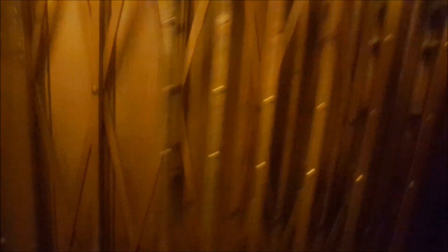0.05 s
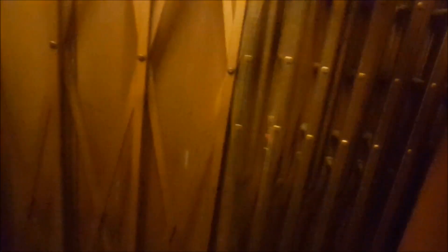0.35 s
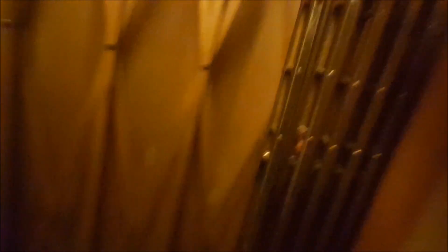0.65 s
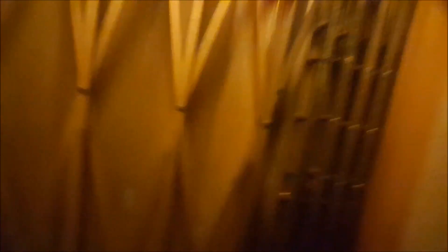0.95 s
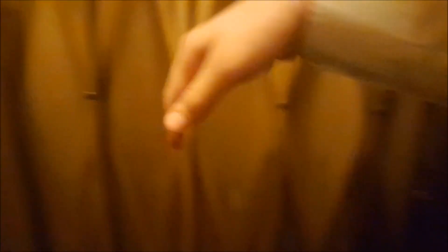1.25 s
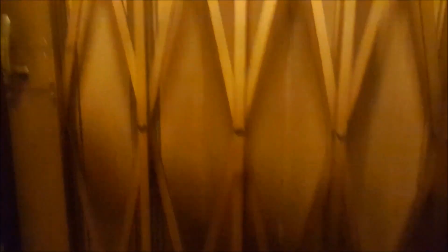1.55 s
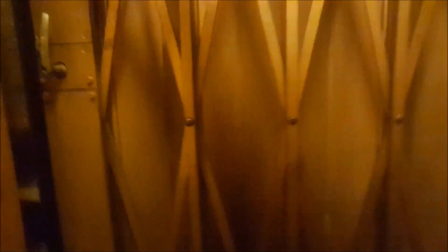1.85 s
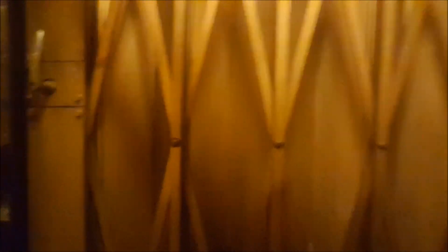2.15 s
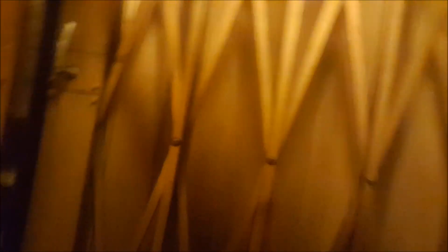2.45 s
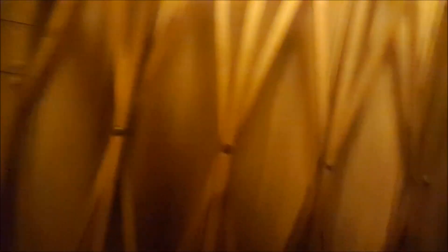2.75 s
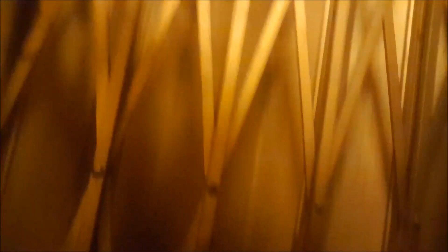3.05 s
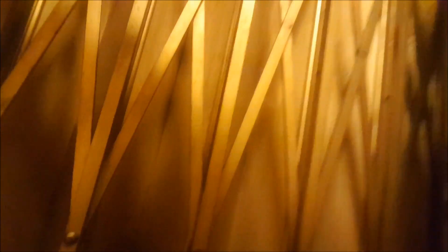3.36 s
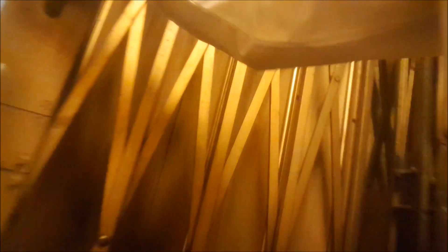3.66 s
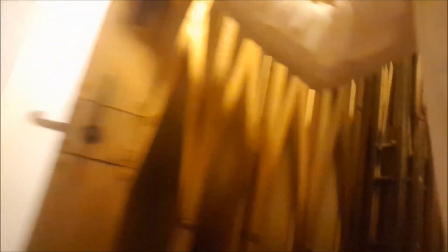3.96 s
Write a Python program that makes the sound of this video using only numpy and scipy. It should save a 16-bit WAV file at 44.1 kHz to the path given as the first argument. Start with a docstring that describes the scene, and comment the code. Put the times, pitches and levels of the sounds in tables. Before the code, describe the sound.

A folding metal lattice gate rattles and clanks, pauses, then is dragged again.

```python
"""Folding lattice gate in a small old lift

A steel gate is run along its track, rests, and is dragged again. The rollers groan and drive the
cabin into resonance; loose links tick and bars clank, each impact ringing in damped modes.
In the pause a soft rustle passes and the gate takes a knock; a low rumble lies underneath."""
import sys
import numpy as np
from scipy import signal
from scipy.fft import rfft, irfft
from scipy.io import wavfile
from scipy.ndimage import uniform_filter1d

SR = 44100
rng = np.random.default_rng(int(sys.argv[2]) if len(sys.argv) > 2 else 0)


def master(y):
    """Save y as 16-bit WAV."""
    cut = np.clip(np.atleast_2d(y).T, -1, 1)
    pcm = np.round(cut * 32767)  # scale
    wavfile.write(sys.argv[1], SR, pcm.astype(np.int16))


N = 176400
T = np.arange(N) / SR
AGE = T[:SR // 2]  # seconds since an impact
TILT_FROM_HZ = 580  # brightness tilts a spectrum above this frequency


def from_db(db):
    """Amplitude grows tenfold for every 20 dB."""
    return 10 ** (np.asarray(db) / 20)


def rms_one(x):
    """Normalisation to unit mean power."""
    return x / np.sqrt(np.mean(x ** 2) + 1e-20)


def envelope(rows):
    """Amplitude over time, interpolated in decibels."""
    return from_db(np.interp(T, *np.transpose(rows)))


def at_hz(points, hz):
    """Interpolation on a logarithmic frequency axis."""
    frequencies, values = np.transpose(points)
    return np.interp(np.log(hz + 1), np.log(frequencies), values)


def decay(t60):
    """Exponential damping: 60 dB in t60 seconds."""
    return from_db(-60 * AGE / t60)


def add(out, start_s, sound):
    """Superposition: a sound sums into the mix from its start time."""
    i = max(int(start_s * SR), 0)
    out[:, i:i + sound.shape[1]] += sound[:, :N - i]


def contacts(per_s, spread_db):
    """A Poisson process of small impacts of uneven strength."""
    hits = rng.random(N) < per_s / SR
    strength = from_db(spread_db * np.minimum(rng.exponential(1, N), 3))
    return hits * strength * rng.standard_normal((2, N))


# The stereo field. Each row: frequency in Hz, left-right correlation.
COHERENCE = [(40,.99),(100,.95),(170,.95),(270,.9),(450,.8),(740,.4),(1300,0),(12000,0)]
# Each row: frequency in Hz, left minus right level in dB.
BALANCE = [(50,1.5),(210,0),(350,9.5),(500,3.5),(770,2),(1800,.3),(4200,0),(6400,-2.5),(9500,6),(14000,0)]

def coloured(pair, spectrum, tilt_db=0):
    """Partial coherence: sum and difference of two signals form a filtered stereo field of unit rms."""
    hz = np.fft.rfftfreq(pair.shape[1], 1 / SR)
    mid, side = rfft(pair)
    alike = np.clip(at_hz(COHERENCE, hz), -.99, .995)
    sign = np.array([[1], [-1]])
    field = np.sqrt(1 + alike) * mid + sign * np.sqrt(1 - alike) * side
    octaves = np.log2(np.maximum(hz / TILT_FROM_HZ, 1))
    gain_db = at_hz(spectrum, hz) + tilt_db * octaves + sign * at_hz(BALANCE, hz) / 2
    return rms_one(irfft(field * from_db(gain_db), pair.shape[1]))


def noise(spectrum, size=N, tilt_db=0):
    """Spectral shaping of white noise, in stereo."""
    return coloured(rng.standard_normal((2, size)), spectrum, tilt_db)


# Spectra of the background. Each row: frequency in Hz, relative density in dB.
AIR_SPECTRUM = [(18, -15), (30, -6), (64, 10), (173, -34), (264, -7.5), (309, -22), (1080, -10),
                (1170, -21.5), (15700, -35.5)]
RUMBLE_SPECTRUM = [(15,2),(30,-10),(52,4.5),(70,-17.5),(88,-4.5),(110,-10),(170,-12),(400,-73)]
RUSTLE_SPECTRUM = [(300,-29),(700,7),(1500,6),(2800,2),(5000,-5),(9300,-9.5),(10400,-19.5),(15500,-16.5)]
# Their envelopes. Each row: time in seconds, relative level in dB.
RUMBLE_LEVELS = [(0.0, -33), (0.34, -44), (0.79, -37), (1.58, -61.5), (1.67, -48), (2.06, -70),
                 (2.46, -44.5), (2.9, -65), (3.14, -34.5), (3.41, -35.5), (3.51, -47), (3.56, -34.5),
                 (3.92, -47), (4.0, -47)]
RUSTLE_LEVELS = [(1.2,-69),(1.42,-59),(1.62,-67.5),(1.9,-58.5),(2.05,-60),(2.25,-53.5),(2.35,-56.5),(2.46,-55),(2.53,-65.5),(2.78,-70),(2.9,-57),(2.97,-44.5),(3.02,-48.5),(3.1,-83)]

def background():
    """Amplitude-modulated noise: a soft rustle and a low rumble swell over steady air."""
    rustle = envelope(RUSTLE_LEVELS) * noise(RUSTLE_SPECTRUM)
    rumble = envelope(RUMBLE_LEVELS) * noise(RUMBLE_SPECTRUM)
    return from_db(1.5) * (rustle + rumble) + from_db(-62.5) * noise(AIR_SPECTRUM)


# Envelopes of the two rubs. Each row: time in seconds, level in dB.
SCUFF_LEVELS = [(1.62,-80),(1.655,-49),(1.7,-45),(1.74,-64),(1.86,-85)]
LATCH_LEVELS = [(2.41,-79),(2.424,-41),(2.43,-32.5),(2.441,-45),(2.453,-47.5),(2.49,-90),(2.52,-92)]
# Their spectra. Each row: frequency in Hz, relative density in dB.
SCUFF_SPECTRUM = [(200,-5),(650,4),(1500,-3),(4000,-7.5),(9000,-22),(11000,-33),(15500,-31)]
LATCH_SPECTRUM = [(200,-19),(1000,4.5),(2200,-6),(3300,2),(4150,5.5),(5400,-6),(9000,-9),(10500,-24),(15000,-30)]

def scrapes():
    """Sliding friction makes noise: the gate scuffs as it settles, and the latch scrapes shut."""
    out = np.zeros((2, N))
    for levels, spectrum in (LATCH_LEVELS, LATCH_SPECTRUM), (SCUFF_LEVELS, SCUFF_SPECTRUM):
        touching = (T > levels[0][0]) * (T < levels[-1][0])
        out += envelope(levels) * touching * noise(spectrum)
    return out


def wobble(per_s):
    """Random modulation: straight lines join Gaussian values of unit spread."""
    steps = np.arange(0, T[-1] + 1, 1 / per_s)
    return np.interp(T, steps, rng.standard_normal(N)[:len(steps)])


# Groans and chirps. Each row: midpoint in seconds, length in seconds, pitch in Hz, level in dB.
GROAN_EVENTS = [(0.168,0.14,445,-31),(0.376,0.12,320,-27),(0.566,0.47,318,-33.5),(0.606,0.66,683.3,-42),(.7,.4,84,-36),(0.795,0.094,947,-50),(1.083,0.04,954,-41.5),(1.188,0.17,408,-44),(1.79,.2,166.7,-42.5),(1.753,0.18,567,-52),(1.851,0.073,315,-45),(1.966,.16,443,-56)]

def groans(waver_hz=11, rough_db=3.0):
    """Sustained resonance: a binding roller or strained panel holds one unsteady tone for a moment."""
    out = np.zeros(N)
    for middle, length, hz, db in GROAN_EVENTS:
        swell = np.maximum(1 - (2 * (T - middle) / length) ** 2, 0)
        phase = 2 * np.pi * np.cumsum(hz + waver_hz * wobble(per_s=86)) / SR
        out += swell * from_db(db + rough_db * wobble(per_s=84)) * np.sin(phase)
    return out * from_db([[1.2], [-1.2]])  # slightly to the left


# Rattle of the joints. Each row: time in seconds, relative level in dB.
CHATTER_LEVELS = [(0,-40.5),(.2,-40.5),(.35,-46),(.6,-49.5),(.95,-47.5),(1.08,-55),(1.4,-68.5),(1.6,-94),(2.95,-103),(3.05,-41),(3.28,-35.5),(3.38,-41.5),(3.45,-38),(3.51,-49),(3.58,-43.5),(3.8,-37.5),(4,-40)]
# Each row: frequency in Hz, relative density in dB.
CHATTER_SPECTRUM = [(60,-37),(500,7.5),(1300,11.5),(2400,5.5),(5000,0),(8500,-13),(10400,-19),(15500,-16.5)]

def chatter(per_s=520, t60=0.075, db=-2.5):
    """Shot noise: countless small touches in the lattice's joints overlap as decaying bursts."""
    burst = rng.standard_normal((2, len(AGE))) * decay(t60)
    touches = signal.fftconvolve(contacts(per_s, spread_db=3), burst, axes=1)[:, :N]
    return from_db(db) * envelope(CHATTER_LEVELS) * coloured(touches, CHATTER_SPECTRUM)


def ringing(modes, weight_db, detune, scatter_db=3):
    """Modal superposition: every part is tuned a little differently and every blow excites it unevenly."""
    hz, db = np.transpose(modes)
    hz = hz * (1 + detune * rng.standard_normal(len(hz)))
    gains = from_db(db + weight_db + scatter_db * rng.standard_normal((2, len(hz))))
    phases = np.exp(2j * np.pi * rng.random((2, len(hz))))
    spectrum = np.zeros((2, len(AGE) // 2 + 1), complex)
    spectrum[:, (hz * len(AGE) / SR).astype(int)] = gains * phases
    return rms_one(irfft(spectrum))


# Loose links snap. Each row: start in seconds, relative level in dB, brightness in dB per octave.
LINK_SNAPS = [(0.024,-29.5,0.5),(0.035,-38.5,7),(0.075,-43,3),(0.092,-41,0),(0.128,-44,3),(0.137,-46,-2),(0.168,-36,2),(0.187,-38,0),(0.219,-37.5,4),(0.243,-39,-5),
              (0.281,-30,1),(.296,-35,1),(.31,-38.5,1),(0.354,-45,2),(.373,-41.5,-2),(0.435,-50,5),(0.527,-43.5,4),(0.56,-45,3),(0.595,-49.5,0),(0.624,-45.5,3),(0.688,-46.5,-7),(0.699,-46,4),(0.711,-45,0.5),
              (0.789,-45,5),(0.812,-42,2),(0.887,-51.5,-3),(0.935,-46,0),(0.958,-42,-4.5),(1.008,-51.5,3),(1.031,-47.5,-7),(1.2,-53.5,-8.5),(1.255,-59,-5),(1.341,-45.5,1.5),(1.38,-54,-7),(1.52,-59,-1),
              (2.321,-51.5,4),(2.357,-47,-6.5),
              (3.041,-38.5,-2.5),(3.07,-37,-4),(3.099,-39.5,-1),(3.129,-40,-1),(3.1435,-26.5,2),(3.213,-45,6),(3.233,-28,-7),(3.257,-34.5,5),(3.288,-26,5),(3.296,-30.5,-8),(3.315,-31.5,-5.5),
              (3.372,-44.5,-8),(3.4,-40.5,-4),(3.43,-38.5,-3.5),(3.438,-41,-6),(3.475,-42.5,-3.5),(3.534,-44,-7),(3.563,-37,-4.5),(3.609,-46.5,-1),(3.627,-40.5,-2),(3.656,-46.5,5),(3.699,-44,12),(3.708,-30,-6),(3.752,-39.5,-6),(3.772,-49,7),(3.844,-42.5,-4),(3.89,-50,-3),(3.931,-43,-3),(3.975,-42,2)]
# Modes of a link. Each row: frequency in Hz, relative level in dB.
LINK_RESONANCES = [(2203,-33),(2309,8),(2850,-1),(3112,-18),(3548,1),(3950,11),(4371,5),(4893,-5),(5300,0),(5658,10),(6875,15),(7197,7),(8683,-28)]
# Spectra of the crack and its reflections. Each row: frequency in Hz, relative density in dB.
CRACK_SPECTRUM = [(80,-61),(1500,-4.5),(3500,6.5),(7000,4),(9500,-2.5),(11000,-9),(15500,-16)]
SPRAY_SPECTRUM = [(80,-82),(600,-37),(2000,-5.5),(3300,0.5),(5000,-1.5),(7000,-5.5),(9300,-9.5),(10400,-31),(15500,-34)]

def links(attack_s=0.00047, echo_s=0.0065):
    """Impact and reflection: a link cracks and rings in a spray of close echoes and one off the wall."""
    out = np.zeros((2, N))
    mode_octaves = np.log2(np.array(LINK_RESONANCES)[:, 0] / TILT_FROM_HZ)
    spray_fade = decay(t60=0.072) + from_db(-22) * decay(t60=0.085)
    for start, db, tilt in LINK_SNAPS:
        crack = from_db(2) * noise(CRACK_SPECTRUM, len(AGE), tilt) * decay(t60=0.035)
        spray = noise(SPRAY_SPECTRUM, len(AGE), tilt) * spray_fade
        ring = from_db(-7) * ringing(LINK_RESONANCES, tilt * mode_octaves, detune=.016) * decay(t60=0.055)
        snap = from_db(db) * (crack + spray + ring) * (1 - np.exp(-AGE / attack_s))
        add(out, start, snap)
        echo = from_db(-9) * snap[::-1]  # left and right change places
        add(out, start + echo_s * rng.uniform(.5, 2.0), echo)
    return out


# Bars collide. Each row: start in seconds, relative level in dB, most excited frequency in Hz.
BAR_BLOWS = [(.081,-34.5,1660),(0.155,-33,1150),(.188,-33.5,1170),(.376,-24,1380),(0.487,-35.5,1320),(.72,-43.5,1370),(.847,-39,1400),(.969,-32,1160),(1.39,-52,1300),(2.768,-64,1290),(3.147,-29,1040),(3.234,-24,1990),(3.256,-28.5,1250),(3.703,-34.5,1550),(3.768,-34,1750),(3.813,-30.5,1300),(3.869,-30.5,1200)]
# Modes of the bars. Each row: frequency in Hz, relative level in dB.
BAR_RESONANCES = [(680,8.5),(856,8.5),(1048,-6),(1140,-8),(1212,2),(1345,7),(1380,-3.5),(1544,1),(1700,3.5),(1966,-2.5),(2203,-3),(2305,0)]
# Noise of a blow. Each row: frequency in Hz, relative density in dB.
CLANK_SPECTRUM = [(40,-49),(150,-25),(400,-5),(700,-4),(1100,3),(1400,-1.5),(1700,-4.5),(2200,-10.5),(3200,-21),(8000,-62),(15000,-67)]

def bars(attack_s=0.00031, focus_db=6, focus_octaves=0.19):
    """Selective excitation: the place where two bars strike favours some of their modes."""
    out = np.zeros((2, N))
    mode_hz = np.array(BAR_RESONANCES)[:, 0]
    for start, db, hz in BAR_BLOWS:
        favoured_db = focus_db * np.exp(-(np.log2(mode_hz / hz) / focus_octaves) ** 2)
        spray = from_db(-2) * noise(CLANK_SPECTRUM, len(AGE)) * decay(t60=0.16)
        ring = ringing(BAR_RESONANCES, favoured_db, detune=0.002) * decay(t60=0.11)
        add(out, start, from_db(db) * (spray + ring) * (1 - np.exp(-AGE / attack_s)))
    return out


# The frame strikes the cabin. Each row: start in seconds, relative level in dB, pitch in Hz.
FRAME_KNOCKS = [(0.048,-38,163),(0.201,-23.5,392),(0.241,-26,362),(0.373,-21,318),(1.219,-49,407),(1.241,-34,174),(1.735,-51,171),(2.195,-47,164),(2.369,-23,368),(2.388,-29.5,237),(2.598,-43,100),(3.013,-26.5,354),(3.144,-28,300),(3.242,-19,380),(3.329,-21.5,431),(3.552,-23.5,443),(3.814,-18.5,444),(3.866,-22,385),(3.963,-18,378)]

def knocks(swell_s=0.006):
    """Heavy damping: a padded blow swings a panel for a few cycles and the cabin booms after it."""
    out = np.zeros((2, N))
    swing = (AGE / swell_s * np.exp(1 - AGE / swell_s)) ** 2
    boom_shape = from_db(-10) * decay(t60=0.3) * (1 - np.exp(-AGE / swell_s))
    for start, db, hz in FRAME_KNOCKS:
        panel = np.sin(2 * np.pi * hz * AGE) * swing * from_db([[2], [0]])
        boom = noise([(hz / 4, -36), (hz / 2, -9), (hz, 0), (hz * 2, -18), (hz * 20, -110)], len(AGE))
        add(out, start, from_db(db) * (panel + boom * boom_shape))
    return out


# Cabin modes. Each row: frequency in Hz, then relative levels in dB folding, at rest and dragging.
CABIN_RESONANCES = [(51.9,-3.5,1.5,-29),(68.4,-10.5,-9,-11),(84.1,-0.5,-6,-25),(123.4,-10,-5,-27),(160.2,-6.5,4,0),(167.1,6.5,-7,4),(231.8,-15,-2.5,-4.5),(260.7,-6,-38,1),(290,3.5,-33,-8),(319.4,-4,1,0),(341,-5.5,-41,-12),(359.4,3,-6,-3),(414.6,-7,-28,0.5),(444.3,1.5,-15,-7),(548.4,-17,-15,-9.5),(594,-19,-28,-14),(673.6,-5.5,-26,-15.5),(761.5,-4.5,-25,-14),(884,-15,-11,-19)]

def cabin(column, t60):
    """Forced vibration: noise drives each cabin mode to a level that depends on the gate's place."""
    body = 0
    for mode in CABIN_RESONANCES:
        hz, db = mode[0], mode[column]
        pole = from_db(-60 / (t60 * SR)) * np.exp(2j * np.pi * hz / SR)
        octave = signal.butter(2, [hz / np.sqrt(2), hz * np.sqrt(2)], "band", fs=SR, output="sos")
        drive = signal.sosfilt(octave, rng.standard_normal(N + SR))
        ring = signal.lfilter([1], [1, -pole], drive)[SR:]  # steady state after one second
        running_rms = np.sqrt(uniform_filter1d(np.abs(ring) ** 2, size=6000))
        body = body + from_db(db) * ring.real / running_rms
    return rms_one(body) * from_db([[.8], [-.8]])


# The gate folds, settles and is dragged. Each row: time in seconds, relative level in dB.
FOLD_LEVELS = [(0,-20),(.1,-23),(.21,-21),(.32,-24),(.5,-30),(.72,-30.5),(.87,-33),(.95,-40.5),(.98,-29.5),(1.08,-35.5),(1.19,-43.5),(1.25,-43),(1.32,-45),(1.5,-52.5),(1.64,-53.5)]
REST_LEVELS = [(1.63,-61),(1.655,-44.5),(1.8,-45.5),(1.93,-48),(2.05,-51),(2.18,-46),(2.28,-53),(2.34,-52)]
DRAG_LEVELS = [(2.33,-47),(2.39,-41.5),(2.46,-41),(2.54,-54.5),(2.65,-53.5),(2.73,-64.5),(2.92,-54),(2.99,-42.5),(3.04,-31.5),(3.11,-33.5),(3.17,-28),(3.26,-21.5),(3.35,-28.5),(3.46,-32.5),(3.53,-37),(3.6,-32.5),(3.78,-27.5),(3.85,-23.5),(3.92,-22.5),(4,-19.5)]
# Spectra of the bumps in each stage. Each row: frequency in Hz, relative density in dB.
FOLD_SPECTRUM = [(65,-65),(140,0),(220,0),(300,-3.5),(460,-5.5),(540,-4.5),(760,-7),(880,-15.5),(1370,-18),(1600,-34),(2500,-47),(5000,-70),(12000,-120)]
REST_SPECTRUM = [(65,-19),(200,2),(400,2),(600,3),(1000,-5),(2500,-23),(9000,-70)]
DRAG_SPECTRUM = [(65,-25),(120,-3.5),(170,6.5),(200,-1),(260,-2),(420,4.5),(560,1),(730,-7.5),(950,-16.5),(2500,-22),(5000,-62),(12000,-120)]

def rollers():
    """Rolling noise: bumps in the track radiate directly and through the cabin's resonances."""
    def stage(levels, spectrum, column, bumps_per_s, direct_db, ring_db, t60):
        running = envelope(levels) * (T >= levels[0][0]) * (T <= levels[-1][0])
        bumps = coloured(contacts(bumps_per_s, spread_db=1.0), spectrum)
        return running * (from_db(direct_db) * bumps + from_db(ring_db) * cabin(column, t60))

    fold = stage(FOLD_LEVELS, FOLD_SPECTRUM, 1, bumps_per_s=900, direct_db=-7, ring_db=-6, t60=0.72)
    rest = stage(REST_LEVELS, REST_SPECTRUM, 2, bumps_per_s=1400, direct_db=-7, ring_db=-2, t60=0.55)
    drag = stage(DRAG_LEVELS, DRAG_SPECTRUM, 3, bumps_per_s=830, direct_db=-5, ring_db=-2.5, t60=0.6)
    return fold + rest + drag


def scene():
    """Linear superposition of the gate's sounds and the background."""
    return links() + bars() + knocks() + chatter() + groans() + scrapes() + rollers() + background()


def record(dry):
    """An elliptic low-pass filter cuts steeply above 16 kHz."""
    return signal.sosfilt(signal.ellip(10, .2, 80, 16000, fs=SR, output="sos"), dry)


dry = scene()
out = record(dry)
master(out)
```